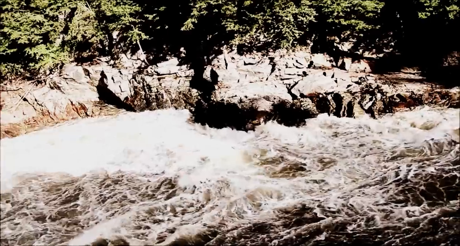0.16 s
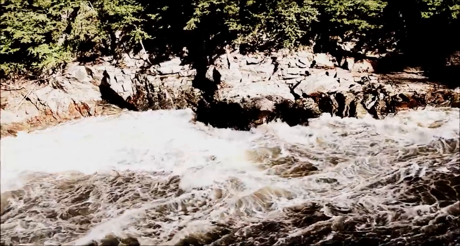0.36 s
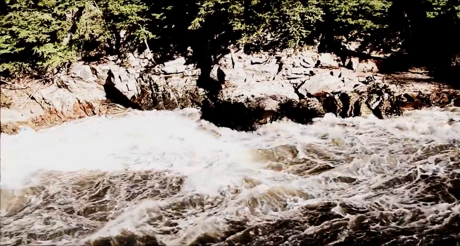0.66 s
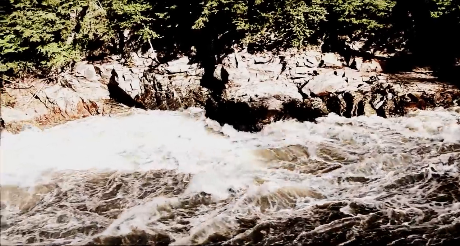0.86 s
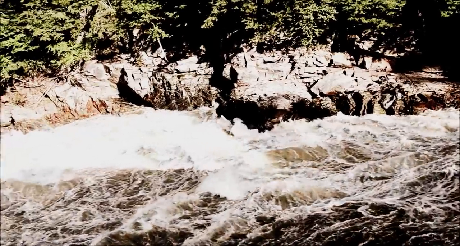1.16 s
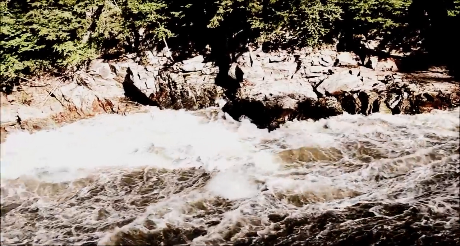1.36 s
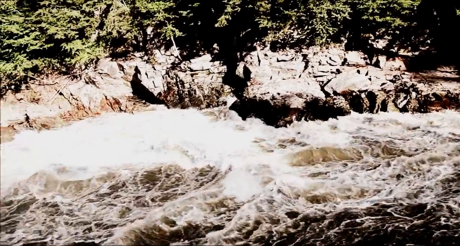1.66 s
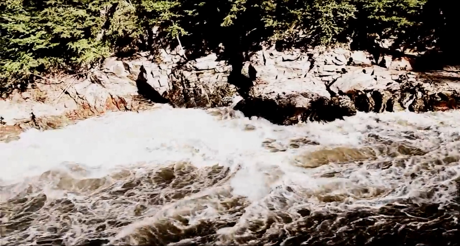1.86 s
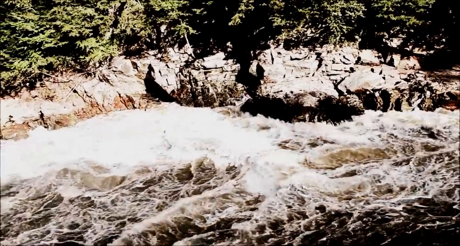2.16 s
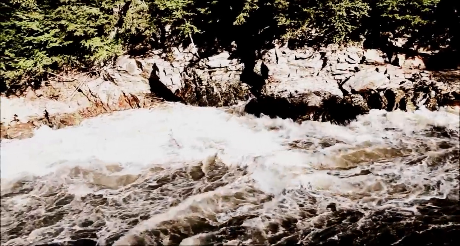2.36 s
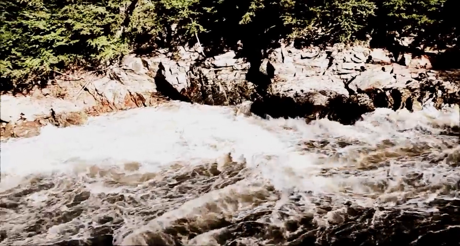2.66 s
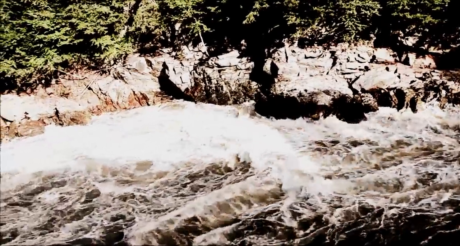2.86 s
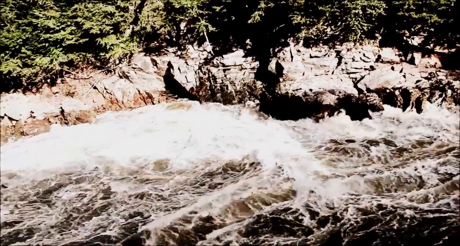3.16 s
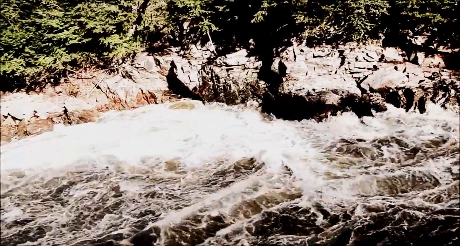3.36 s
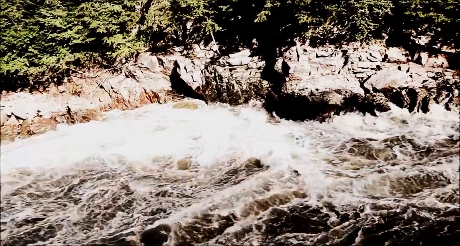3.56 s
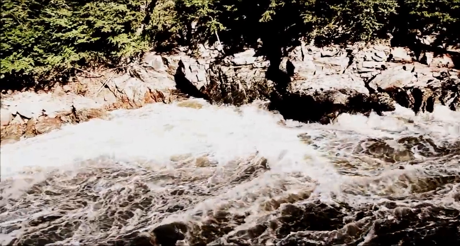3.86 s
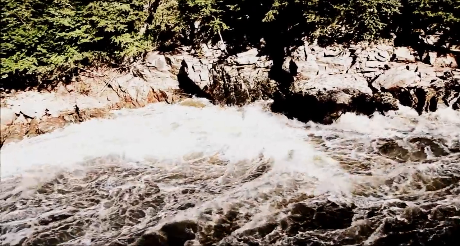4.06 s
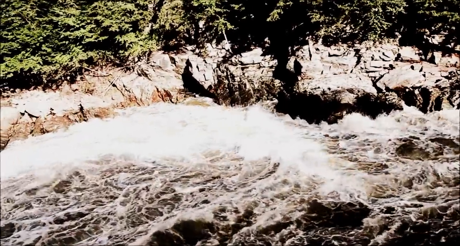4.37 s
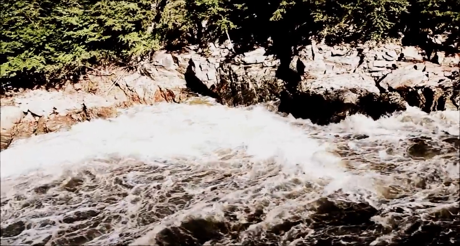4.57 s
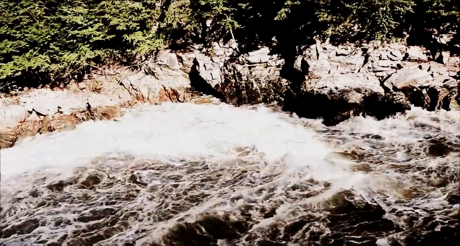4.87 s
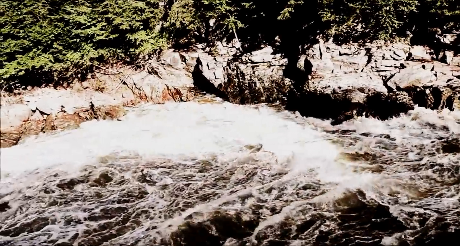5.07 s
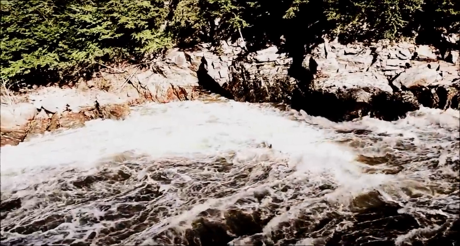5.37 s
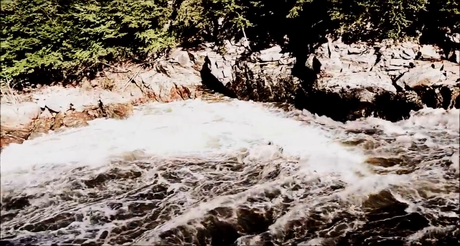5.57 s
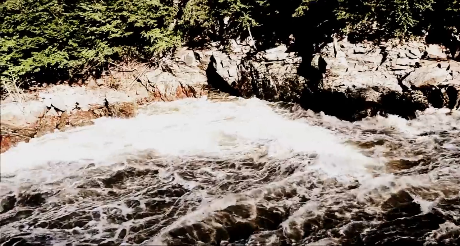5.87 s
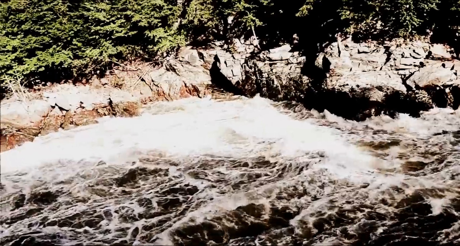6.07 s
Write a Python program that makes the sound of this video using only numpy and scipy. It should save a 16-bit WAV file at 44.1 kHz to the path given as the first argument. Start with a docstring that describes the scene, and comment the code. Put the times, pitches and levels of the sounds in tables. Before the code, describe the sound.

A river in flood rushes over rocks for about six seconds, heard outdoors from the far bank. The whitewater is there from the first moment as a smooth, dense roar. Most of its weight lies in the lows and low mids, where heavy water heaves and foam churns, with a deep rumble below and a much softer hiss of spray above. Distance dulls the top, and the bubbles blur into one continuous rush.

The level barely changes. The water swells slightly at about 0.3 seconds, and the rumble lifts briefly near 0.9 and 2.1 seconds. Another small, low surge comes around 4.5 seconds, and the rumble eases for a moment near 5.7 seconds. An extremely faint, thin, high whine holds steady under the hiss throughout. The roar carries on to the end without fading.

```python
"""A river in flood breaks white over rocks, heard from the far bank.
Countless air pockets and bubbles burst at once and blur into a smooth roar: big pockets rumble,
heavy water heaves, the foam roars, fine spray hisses. Now and then the level rises or dips briefly.
A faint steady whine, likely electrical, lies under the hiss."""
import sys
import numpy as np
from scipy import signal
from scipy.fft import rfft, irfft
from scipy.io import wavfile
from scipy.ndimage import map_coordinates

SR = 44100
rng = np.random.default_rng(int(sys.argv[2]) if len(sys.argv) > 2 else 0)


def store_wav(level_fs):
    """Save 16-bit WAV to argv[1]."""
    pcm = np.round(np.clip(np.atleast_2d(level_fs), -1, 1) * 32767)
    wavfile.write(sys.argv[1], SR, pcm.T.astype(np.int16))


N = 274302


def from_db(db):
    """Decibels to gain."""
    return 10 ** (np.asarray(db) / 20)


def rms_one(x):
    """Scale to rms 1."""
    return x / np.sqrt(np.mean(x ** 2) + 1e-20)


def drift(points_per_s):
    """A slow wander of rms 1: random points, smoothly joined."""
    points = rng.standard_normal(1000)
    return rms_one(map_coordinates(points, [5 + np.arange(N) / SR * points_per_s], order=3))


def bursts(churn_db, churn_per_s, bursts_per_s=36000):
    """Bubbles burst as clicks of random time, size and sign; the churn makes them swell and sink a touch."""
    popped = rng.random(N) < bursts_per_s / SR
    clicks = popped * rng.standard_normal(N)
    return clicks * from_db(churn_db * drift(churn_per_s))


def bubble_family(clicks, hz, power_share):
    """Colour the bursts with the part of the whitewater spectrum that one bubble size fills; rms 1."""
    # tone of the whitewater, dulled by distance: (frequency [Hz], relative level [dB])
    whitewater = [(20, -16), (45, -8), (75, -2.5), (150, -3.5), (270, -1), (340, -3), (450, -2),
                  (600, -4.5), (880, -8.5), (1420, -16.5), (2100, -23.5), (2900, -30), (3700, -32),
                  (4600, -36.5), (6400, -40.5), (7500, -51), (8200, -58.5), (8600, -70.5)]
    pitch_hz, level_db = np.transpose(whitewater)
    colour = from_db(np.interp(np.log(hz), np.log(pitch_hz), level_db))
    band = colour * np.sqrt(np.clip(power_share, 0, 1))
    return rms_one(irfft(rfft(clicks) * band, N))


def rapids():
    """Four bubble sizes, from big pockets to fine spray, fill four bands that cross over smoothly."""
    hz = np.maximum(np.arange(N // 2 + 1) * SR / N, 1)
    crossovers_hz = (150, 420, 1500)
    below_low, below_mid, below_high = (1 / (1 + (hz / edge) ** 6) for edge in crossovers_hz)
    rumble = bubble_family(bursts(churn_db=-0.14, churn_per_s=5.2), hz, below_low)
    heave = bubble_family(bursts(churn_db=-0.02, churn_per_s=7), hz, below_mid - below_low)
    roar = bubble_family(bursts(churn_db=0.32, churn_per_s=9), hz, below_high - below_mid)
    spray = bubble_family(bursts(churn_db=0.28, churn_per_s=15), hz, 1 - below_high)
    rumble_db, heave_db, roar_db, spray_db = -25, -21.5, -21.5, -35.5   # resting levels
    rumble_lift_db, heave_lift_db, roar_lift_db, spray_lift_db = rises_and_dips()
    return (from_db(rumble_db + rumble_lift_db) * rumble
            + from_db(heave_db + heave_lift_db) * heave
            + from_db(roar_db + roar_lift_db) * roar
            + from_db(spray_db + spray_lift_db) * spray)


def whine():
    """A thin steady sine, likely electrical, tucked under the hiss."""
    # the whine's single tone: (frequency [Hz], rms level [dB])
    tones = [(7838, -83)]
    t = np.arange(N) / SR
    return sum(np.sqrt(2) * from_db(db) * np.sin(2 * np.pi * hz * t) for hz, db in tones)


def rises_and_dips():
    """The level of each band rises or dips briefly on smooth bells; four curves in dB."""
    # brief irregular rises and dips in the level of the steady roar, per band:
    # (time [s], half width [s], rumble lift [dB], heave lift [dB], roar lift [dB], spray lift [dB])
    fluctuations = [(.3, 0.14, -0.5, 2.5, 0.5, -0.2), (.88, 0.18, 3, -1.5, 0, 0.4),
                    (1.4, .18, 0.5, 0.5, -0.1, -0.2), (2.1, .13, 1.5, 0.3, 0.2, -0.2),
                    (2.4, 0.12, -0.5, 0, .6, .3), (3.1, .13, 0, 1, 0.8, -0.5),
                    (3.35, .1, -0.5, 0.5, -0.8, 0.8), (3.75, .13, -0.5, 0.5, 0.5, 0),
                    (4.45, 0.14, 2, 1, 0.5, -0.2), (5.7, .13, -2, 0, -0.5, -0.3)]
    centre_s, half_width_s, *lifts_db = np.transpose(fluctuations)
    t = np.arange(N) / SR
    bells = np.exp(-0.5 * ((t - centre_s[:, None]) / half_width_s[:, None]) ** 2)
    return np.array(lifts_db) @ bells


def scene():
    """Water and whine, in mono."""
    return (rapids() + whine())[None]


def record(dry):
    """The microphone loses the deepest bass; the top is cut steeply."""
    low_cut_hz, high_cut_hz = 18, 8489
    low_cut = signal.butter(1, low_cut_hz, "high", fs=SR, output="sos")
    high_cut = signal.ellip(10, 0.1, 50, high_cut_hz, fs=SR, output="sos")
    return signal.sosfilt(high_cut, signal.sosfilt(low_cut, dry))


dry = scene()
out = record(dry)
store_wav(out)
```